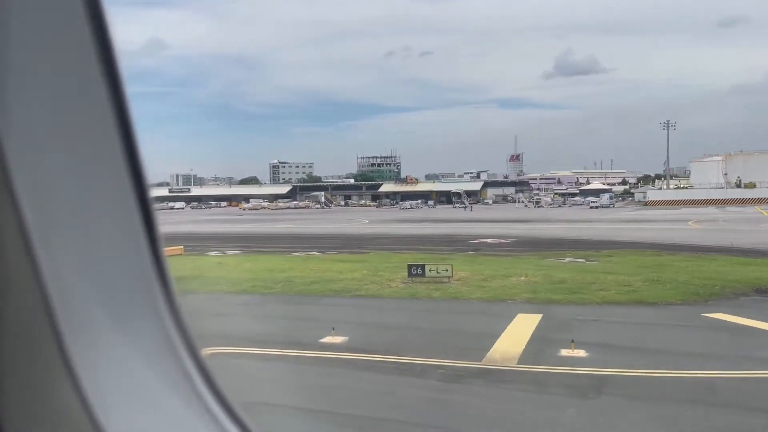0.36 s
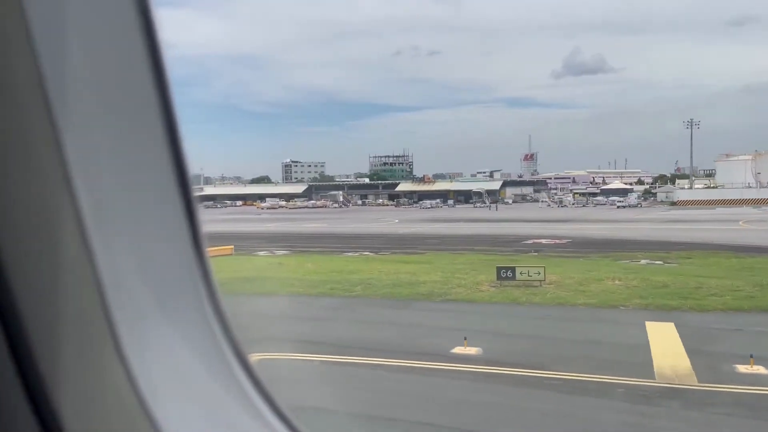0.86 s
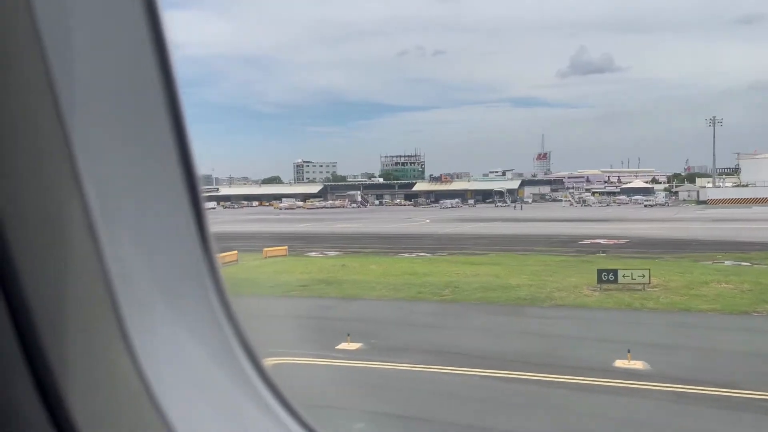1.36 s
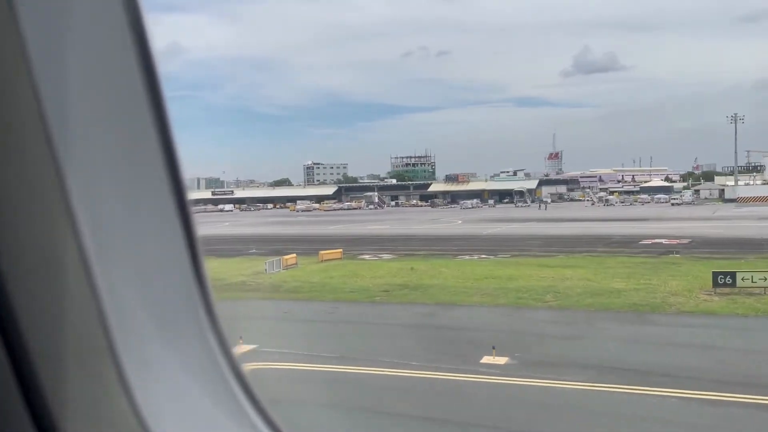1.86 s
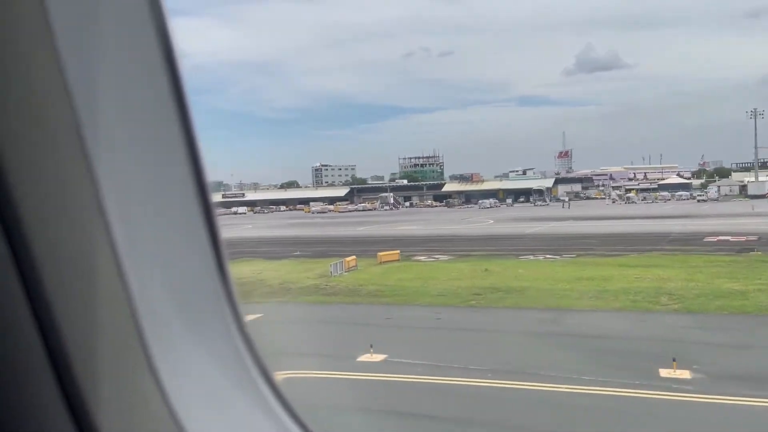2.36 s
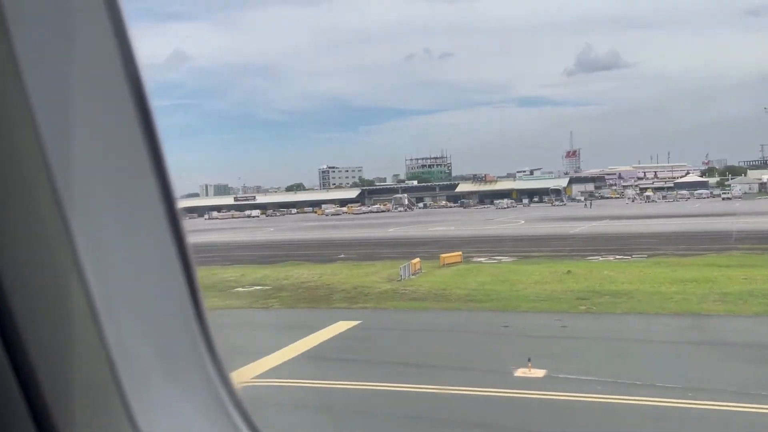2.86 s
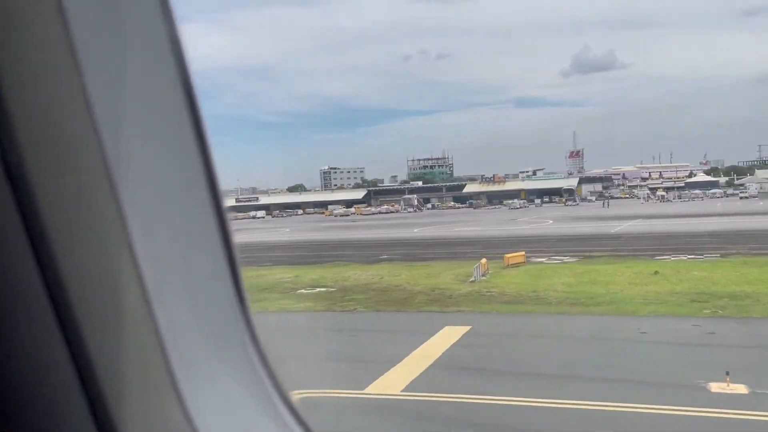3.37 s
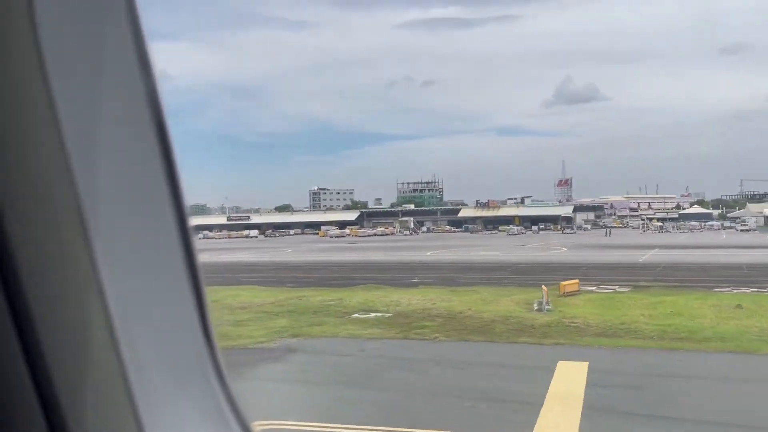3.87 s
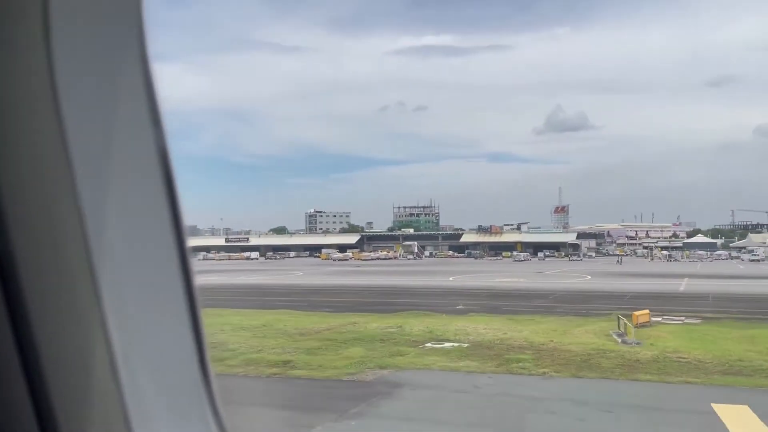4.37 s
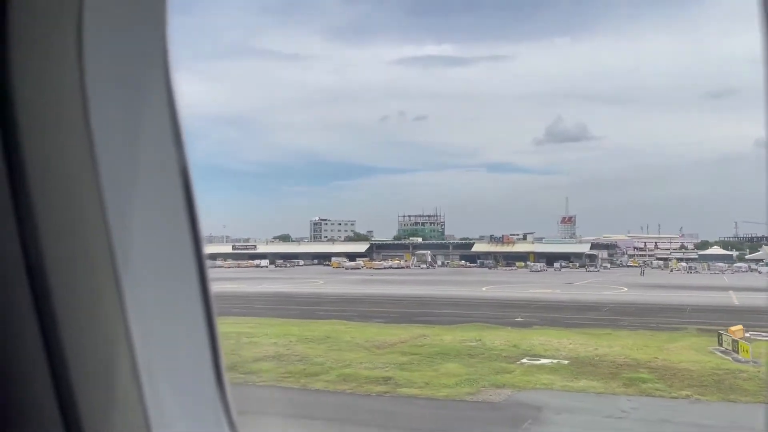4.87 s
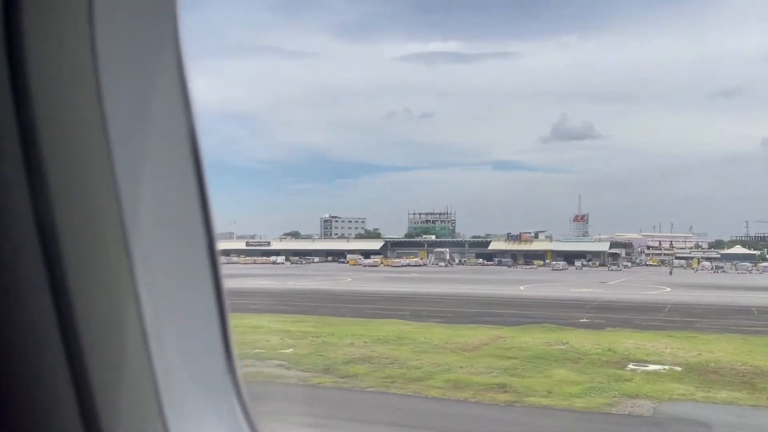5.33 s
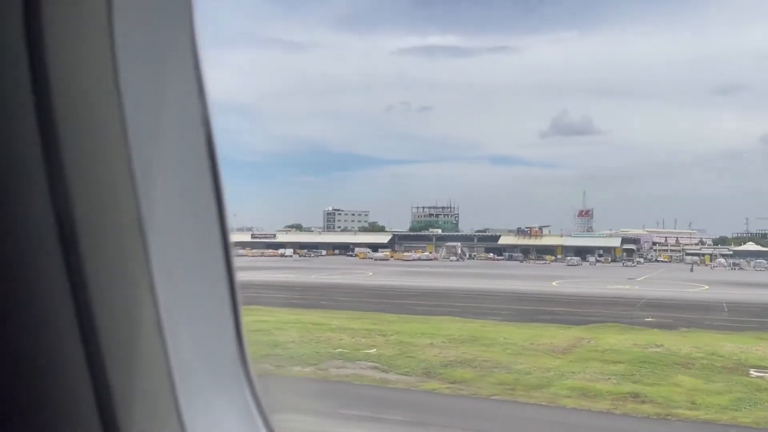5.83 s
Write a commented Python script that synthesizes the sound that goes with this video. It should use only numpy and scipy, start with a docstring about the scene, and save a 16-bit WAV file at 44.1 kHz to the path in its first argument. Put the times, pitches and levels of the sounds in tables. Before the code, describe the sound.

Inside a taxiing airliner cabin, a loud deep fuselage boom and airy vent hiss continue while trim panels knock and rattle over bumps.

```python
"""A deep fuselage boom and vent hiss throughout, inside a taxiing airliner cabin, on two close microphone ports.
Wheels and idling engines shake the fuselage; air conditioning and engine roar are coloured, flickering noise.
Pumps and spools hum and whine as wandering sines. Two bright ticks are noise bursts, a double moan is a
swelling tone, and a swish is a short swell of noise. Bumps in the taxiway make the trim panels rattle and
knock: struck resonances."""
import sys
import numpy as np
from scipy import signal
from scipy.fft import rfft, irfft, next_fast_len
from scipy.io import wavfile
from scipy.ndimage import uniform_filter1d

SR = 44100
rng = np.random.default_rng(int(sys.argv[2]) if len(sys.argv) > 2 else 0)


def invert_db(level):
    """Linear amplitude ratio for a level in decibels (20 dB per decade), elementwise."""
    return 10 ** (np.asarray(level, dtype=float) / 20)


def master(y):
    """Save y as 16-bit WAV."""
    cut = np.clip(np.atleast_2d(y).T, -1, 1)
    pcm = np.round(cut * 32767)  # scale
    wavfile.write(sys.argv[1], SR, pcm.astype(np.int16))


N = 263277
SIZE = next_fast_len(N)
HZ = np.maximum(np.arange(SIZE // 2 + 1) * SR / SIZE, 1)


def rms_one(x):
    """Scale to rms 1."""
    return x / np.sqrt(np.mean(x ** 2) + 1e-20)


def in_time(rows):
    """Each column after t/s as a curve over the samples."""
    s, *columns = np.transpose(rows)
    return [np.interp(np.arange(N) / SR, s, c) for c in columns]


def at_hz(points):
    """A table read at every frequency, on a log axis."""
    hz, value = np.transpose(points)
    return np.interp(np.log(HZ), np.log(np.maximum(hz, 1)), value)


def colour_of(spectrum):
    """Gain per frequency, silent from an octave outside the table."""
    inside = (HZ > spectrum[0][0] / 2) * (HZ < spectrum[-1][0] * 2)
    return invert_db(at_hz(spectrum)) * inside


def bell(hz, width_hz):
    """Magnitude of a resonance, 1 on top."""
    return 1 / np.sqrt(1 + (2 * (HZ - hz) / width_hz) ** 2)


def with_peaks(colour, peaks):
    """Raise or lower a colour around each (f/Hz, width/Hz, level/dB)."""
    return colour * invert_db(sum(rise_db * bell(hz, width_hz) ** 2 for hz, width_hz, rise_db in peaks))


def drift(rate):
    """Slow chance of spread 1: noise through two equal poles at rate Hz, drawn every 40 samples."""
    r = np.exp(-80 * np.pi * rate / SR)
    slow = signal.lfilter([1], [1, -2 * r, r * r], rng.standard_normal(N // 40 + 2002))
    slow = slow[2000:]  # let the filter settle
    return np.interp(np.arange(N) / 40, np.arange(len(slow)), rms_one(slow - slow.mean()))


# Likeness of the two microphone ports: f/Hz, left-right likeness [0 to 1]
PORT_LIKENESS = [(40, 1), (70, .998), (100, .98), (130, 0.9), (200, 0.92), (360, 0.66), (640, 0.38),
                 (1170, 0.35), (2110, 0.5), (3820, 0.54), (6910, 0.52), (9000, .31), (12500, 0.2)]
# Balance of the ports: f/Hz, left minus right level/dB
PORT_TILT = [(60, -0.15), (130, 0), (280, -0.5), (590, -2), (1270, 0), (2720, 2.5), (5830, 3.5),
             (12500, -1.5)]
# Phase between the ports: f/Hz, left leads by phase/rad
PORT_LEAD = [(30, 0), (520, .3), (780, .5), (1120, 2.7), (1500, 4.6), (1980, 5.0), (2240, 6.3), (2580, 7.1),
             (3270, 6.9), (5340, 6.8), (6290, 6.3), (12700, 6.3)]


def cabin_field(colour):
    """Coloured noise as two close microphone ports hear it, alike in the bass; a pair of spectra."""
    a, b = rfft(rng.standard_normal((2, SIZE)))
    alike = np.clip(at_hz(PORT_LIKENESS), 0, 1)
    right = (alike * a + np.sqrt(1 - alike ** 2) * b) * np.exp(-1j * at_hz(PORT_LEAD))
    half_tilt_db = at_hz(PORT_TILT) / 2
    return colour * np.array([a * invert_db(half_tilt_db), right * invert_db(-half_tilt_db)])


def patchy(field, low_hz, high_hz, patchy_db, rate, count):
    """Overlapping bands, each flickering on its own and a little together; rms 1."""
    place = np.clip(np.log(HZ / low_hz) / np.log(high_hz / low_hz), 0, 1) * (count - 1)
    together = drift(rate / 3)
    total = 0
    for k in range(count):
        band = irfft(field * np.clip(1 - abs(place - k), 0, 1), SIZE)[:, :N]
        total = total + invert_db(patchy_db * (drift(rate) + 0.29 * together)) * band
    return rms_one(total)


# Shaking of the fuselage while rolling: t/s, deep boom level/dB, upper boom level/dB
ROLL_LEVELS = [(0, -23, -23), (.45, -18, -22), (.7, -26, -22), (1.25, -17, -21.5), (1.7, -21, -22),
               (2.05, -18, -22.5), (2.5, -23, -22), (2.85, -22, -20.5), (3.1, -18, -21), (3.55, -16, -21),
               (4.1, -17, -20.5), (4.6, -21.5, -21.5), (4.97, -21.5, -23), (5.12, -15.5, -18.5),
               (5.55, -19.5, -19.5), (5.97, -18, -20)]
# Colour of the boom: f/Hz, relative density level/dB per Hz
BOOM_COLOUR = [(22, -19), (33, -24), (40, 0), (66, 0.5), (100, -8), (140, -11.5), (167, -14), (205, -18),
               (237, -28), (300, -38.5), (500, -90)]
# Fuselage resonances: f/Hz, width/Hz, level over the boom/dB
FUSELAGE_MODES = [(45.3, 4.2, 6.5), (59.2, 1.4, 7), (71.5, 1.6, 3.5), (87.7, 9.1, 2), (160.5, 2.9, 4.5)]


def boom():
    """Road and engine shake drive the fuselage, whose low modes stand out; deep and upper parts surge apart."""
    field = cabin_field(with_peaks(colour_of(BOOM_COLOUR), FUSELAGE_MODES))
    deep_share = 1 / (1 + (HZ / 68) ** 8)
    deep_db, upper_db = in_time(ROLL_LEVELS)
    deep = rms_one(irfft(field * deep_share, SIZE)[:, :N])
    upper = patchy(field * (1 - deep_share), 73, 270, patchy_db=1.16, rate=5.3, count=2)
    return invert_db(deep_db) * deep + invert_db(upper_db) * upper


# Bumps in the taxiway: t/s, strength level/dB, settling t60/s
TAXIWAY_BUMPS = [(.6, -52, 3.0), (1.2, -53, 2.0), (2.5, -48, 1.5), (3.7, -54, 2.0), (5.1, -44, 5.0)]


def jolts():
    """Each bump rises quickly and settles; the sum is how hard the trim shakes."""
    rise_s = .05
    t = np.arange(N) / SR
    out = 0
    for s, db, t60 in TAXIWAY_BUMPS:
        since = np.maximum(t - s, 0)
        out = out + invert_db(db - 60 * since / t60) * (1 - np.exp(-since / rise_s))
    return out


# Colour of the roar through the wall: f/Hz, relative density level/dB per Hz
ROAR_COLOUR = [(120, -32.5), (200, -4.5), (245, -8.5), (295, -3), (345, -9.5), (430, -10.5), (544, -14.5),
               (667, -17.5), (805, -18), (1400, -26.5), (1820, -33), (3000, -100)]


def roar():
    """Engine and tyre roar dulled by the wall, dipping very slightly on bumps."""
    smooth_ground_db, strongest_bump_db = -36, -0.5  # the second is added at the hardest shake
    shake = jolts()
    level_db = smooth_ground_db + strongest_bump_db * shake / shake.max()
    noise = patchy(cabin_field(colour_of(ROAR_COLOUR)), 210, 1460, patchy_db=1.2, rate=3.2, count=3)
    return invert_db(level_db) * noise


def shifting_ripple(x, count):
    """Fine standing waves that shift as the hand moves: random peaks and dips, pattern blending into pattern."""
    ripple_db, ripple_width_hz = 2.5, 70
    spectrum, bins = rfft(x, SIZE), int(ripple_width_hz * SIZE / SR)
    place = np.arange(N) / N * (count - 1)
    patterns = rng.standard_normal((count, len(HZ)))
    patterns = uniform_filter1d(uniform_filter1d(patterns, bins), bins)
    total = 0
    for k, pattern in enumerate(patterns):
        rippled = irfft(spectrum * invert_db(ripple_db * rms_one(pattern)), SIZE)[:, :N]
        total = total + np.clip(1 - abs(place - k), 0, 1) * rippled
    return rms_one(total)


def whistle(hz, level_db, width_hz):
    """A narrow band of noise carried along a slowly moving, wavering centre."""
    waver_hz, waver_db = 35, 2.5
    # positive frequencies alone, so that the whole band can be shifted
    band = np.fft.ifft(cabin_field(bell(hz.mean(), width_hz) ** 2), SIZE)[:, :N]
    offset_hz = hz - hz.mean() + waver_hz * drift(2.5)
    shifted = np.real(band * np.exp(2j * np.pi * np.cumsum(offset_hz) / SR))
    return invert_db(level_db + waver_db * drift(3.0)) * rms_one(shifted)


# Vent hiss: t/s, level/dB
VENT_LEVEL = [(0, -45), (1.4, -46.5), (3.0, -44.5), (4.1, -44.5), (4.75, -45), (5.27, -44), (5.97, -45)]
# Colour of the hiss: f/Hz, relative density level/dB per Hz
HISS_COLOUR = [(650, -18.5), (1100, 0), (1510, -4.5), (1880, 0.5), (2260, -2.5), (2640, -2), (3350, -5),
               (4160, -6.5), (4810, -11), (5560, -14), (8500, -13), (11000, -10.5), (11700, -13),
               (13000, -13), (16800, -61)]
# Narrow treble peaks and a notch: f/Hz, width/Hz, level/dB
TREBLE_PEAKS = [(8950, 120, 6), (9780, 380, 9), (10250, 160, -22), (10900, 600, 8)]
# Standing waves by the window: f/Hz, width/Hz, level/dB
WINDOW_WAVES = [(3060, 150, 3), (3450, 160, -3), (3660, 130, 3), (4530, 170, 4), (6240, 60, 4)]
# Breathy vent whistles: t/s, upper f/Hz, upper level/dB, lower f/Hz, lower level/dB
VENT_WHISTLES = [(0, 4330, -63, 2820, -62), (1.4, 4270, -61, 2760, -58), (2.4, 4260, -60, 2650, -59),
                 (2.9, 4210, -58.5, 2600, -58), (4.05, 4190, -56.5, 2600, -59), (4.3, 4200, -66, 2620, -57),
                 (5.97, 4300, -64, 2560, -58)]


def air():
    """Vent hiss, coloured by the window and narrow treble peaks, with two faint breathy whistles."""
    field = cabin_field(with_peaks(colour_of(HISS_COLOUR), TREBLE_PEAKS + WINDOW_WAVES))
    hiss = shifting_ripple(patchy(field, 1370, 10200, patchy_db=1.1, rate=14.0, count=5), count=8)
    upper_hz, upper_db, lower_hz, lower_db = in_time(VENT_WHISTLES)
    upper = whistle(upper_hz, upper_db, width_hz=110)
    lower = whistle(lower_hz, lower_db, width_hz=190)
    return invert_db(in_time(VENT_LEVEL)[0]) * hiss + upper + lower


def wandering(hz, width_hz):
    """Phase of a tone whose random walk widens it to its width."""
    walk = np.cumsum(rng.standard_normal(N)) * np.sqrt(2 * np.pi * abs(width_hz) / SR)
    return 2 * np.pi * hz * np.arange(N) / SR + walk


# Hums and whines, the two lowest beating together:
# f/Hz, width/Hz, rms level/dB, left minus right level/dB, left leads by phase/rad, swell spread/dB
HUM_TONES = [(385.4, .15, -45, -8, .4, 1.8), (391.6, .15, -49.5, -8, .4, 1.5),
             (545, 10, -50, -1.5, .4, 2.8), (835, 8, -61, .3, .6, 2.8), (5866, 4, -73, 1.5, .4, 2.8)]


def hums():
    """Steady pump and spool tones that swell a little."""
    out = np.zeros((2, N))
    for hz, width_hz, level_db, pan_db, lead, swell_db in HUM_TONES:
        swell = np.sqrt(2) * invert_db(level_db + swell_db * drift(9.0))
        pan = invert_db([[pan_db / 2], [-pan_db / 2]])
        out += swell * pan * np.sin(wandering(hz, width_hz) - np.array([[0], [lead]]))
    return out


# Spool whine: t/s, fundamental level/dB
WHINE_LEVEL = [(0, -58), (1.9, -58.5), (2.3, -56), (2.6, -58), (3.2, -63.5), (3.9, -70), (4.75, -66),
               (5.97, -62)]
# Fundamental and its overtones in order: level/dB over the fundamental
SPOOL_PARTIALS = [0, -9, -12]


def spool():
    """The engine whine, with two overtones locked to it, slightly stronger on the left."""
    phase = wandering(hz=1936, width_hz=2.1)
    right_lead = np.array([[0], [1.1]])  # radians
    whine = sum(invert_db(db) * np.sin((k + 1) * phase + right_lead) for k, db in enumerate(SPOOL_PARTIALS))
    return np.sqrt(2) * invert_db(in_time(WHINE_LEVEL)[0]) * invert_db([[1.1], [-1.1]]) * whine


# Bright ticks: t/s, bright strength level/dB, bright t60/s, core strength level/dB
TICK_EVENTS = [(.088, -23.5, 0.08, -38), (4.87, -25, 0.065, -35.5)]
# Colour of the bright part: f/Hz, relative density level/dB per Hz
TICK_SPECTRUM = [(900, -1), (2500, -14), (5000, -12), (7500, -7.5), (10500, 2.5), (12500, -4), (14000, -17),
                 (15500, -17), (17000, -40)]


def ticks():
    """Short bursts of bright noise with a dry core, close to the microphone and so near the centre."""
    rise_s, core_t60_s, core_low_hz, core_high_hz = 0.002, .05, 2300, 9000
    halo_s, halo_db, side_db = .014, -19, -8
    t = np.arange(N) / SR
    bright_shape = core_shape = 0
    for s, strength_db, t60, core_db in TICK_EVENTS:
        since = np.clip(t - s, 0, 1)
        rise = 1 - np.exp(-since / rise_s)
        # a faint smear of noise is heard just ahead of each tick and under its start
        halo = invert_db(halo_db) * np.exp(-((t - s) / halo_s) ** 2)
        bright_shape = bright_shape + invert_db(strength_db - 6) * (halo + invert_db(-60 * since / t60) * rise)
        # before the tick, rise is zero and so is the core
        core_shape = core_shape + invert_db(core_db - 60 * since / core_t60_s) * rise
    mid, side, core = rfft(rng.standard_normal((3, SIZE)))
    stereo = mid + invert_db(side_db) * side * [[1], [-1]]
    bright = irfft(colour_of(TICK_SPECTRUM) * stereo, SIZE)[:, :N]
    core_colour = (HZ > core_low_hz) / np.sqrt(HZ) / np.hypot(1, (HZ / core_high_hz) ** 2)
    broad = irfft(core * core_colour, SIZE)[:N]
    return bright_shape * rms_one(bright) + core_shape * rms_one(broad)


def floor_boom():
    """A broad low mode of the floor that follows the shaking, smoothed over a fifth of a second."""
    shake = jolts()
    field = cabin_field(bell(86, width_hz=28) ** 2)
    slow = uniform_filter1d(shake / shake.max(), SR // 5)
    return invert_db(-19) * slow * rms_one(irfft(field, SIZE)[:, :N])


# Trim panel modes: f/Hz, level/dB, t60/s
PANEL_MODES = [(393, -6, 0.045), (543, -3, 0.03), (770, -3.5, 0.016), (1240, -3.5, 0.01), (1800, -2, 0.006),
               (2400, -5, 0.006), (3130, -8, 0.008)]


def panel(force, mode):
    """One panel mode, a two-pole resonance, set ringing by a force."""
    hz, level_db, t60 = mode
    r, w = invert_db(-60 / (t60 * SR)), 2 * np.pi * hz / SR
    ring = signal.lfilter([0, np.sin(w)], [1, -2 * r * np.cos(w), r * r], force + 1e-18)
    return invert_db(level_db) * ring


def rattle():
    """Random small taps of uneven size ring the trim panels as hard as the bumps shake them."""
    taps_per_s = 180
    at = np.flatnonzero(rng.random(N) < taps_per_s / SR)
    sizes = invert_db(2.5 * np.minimum(rng.exponential(1, len(at)), 4))
    sound, force = 0, np.zeros((2, N))
    for mode in PANEL_MODES:
        shared, apart = rng.standard_normal(len(at)), rng.standard_normal((2, len(at)))
        force[:, at] = sizes * (shared + 1.1 * apart)
        sound = sound + panel(force, mode)
    return jolts() * rms_one(sound)


# Two short moans: t/s, length/s, f/Hz, peak rms level before panning and waver/dB
MOAN_EVENTS = [(.785, .31, 490, -34), (1.255, .135, 491, -33)]


def moans():
    """A near-pure tone swells twice, as a dragging brake or strut would, nearer the right."""
    peak_share, start_db, end_db, edge_s = .62, -6.5, -9, .035
    waver_db = 1.8
    sag_hz_per_s = 36  # the longer the moan, the deeper its pitch sags in the middle
    out = np.zeros((2, N))
    t = np.arange(N) / SR
    for s, length, hz, peak_db in MOAN_EVENTS:
        done = np.clip((t - s) / length, 0, 1)
        gate = np.clip(np.minimum(done, 1 - done) * length / edge_s, 0, 1)
        swell_db = np.interp(done, [0, peak_share, 1], [start_db, 0, end_db])
        level_db = peak_db + waver_db * drift(11.0) + swell_db
        pitch_hz = hz - sag_hz_per_s * length * np.sin(np.pi * done) ** 2
        phase = 2 * np.pi * np.cumsum(pitch_hz) / SR
        tone = np.sin(phase - np.array([[0], [.6]]))  # left leads, radians
        out += np.sqrt(2) * invert_db(level_db) * gate * invert_db([[-2.4], [2.4]]) * tone
    return out


# Trim knocks: t/s, strength level/dB, brightness f/Hz, contact length/s
TRIM_KNOCKS = [(2.505, -27, 900, 0.0053), (3.058, -30, 1200, 0.0036), (3.580, -31, 2400, 0.0006),
               (3.598, -28.5, 1500, .0006), (3.633, -26, 1100, 0.0015), (3.654, -28.5, 1200, .0012),
               (3.676, -29, 1600, 0.003), (3.7135, -21, 900, 0.001), (3.735, -23.5, 700, .018),
               (3.762, -21.5, 700, 0.002), (3.778, -21, 500, .006), (3.795, -22.5, 500, 0.015),
               (3.868, -22.5, 650, .02), (5.135, -30, 2600, 0.025), (5.2, -23.5, 1800, 0.02),
               (5.25, -28.5, 900, 0.025), (5.329, -23, 2400, 0.015), (5.415, -28, 1800, 0.014),
               (5.438, -27, 1800, 0.014), (5.52, -29.5, 1500, 0.02)]


def knocks():
    """Each knock is a tap with a short scuffing contact; modes above its brightness are struck more weakly."""
    out, t = np.zeros((2, N)), np.arange(3000) / SR
    for k, mode in enumerate(PANEL_MODES):
        force = np.zeros((2, N))
        for s, strength_db, bright_hz, length in TRIM_KNOCKS:
            scuff = rng.standard_normal(3000) + 0.36 * rng.standard_normal((2, 3000))
            scuff *= np.exp(-t / length) * (1 - np.exp(-4 * t / length))
            # longer contacts scuff more
            scuff *= length / (length + .003) / np.sqrt(0.002 * SR)
            # short contacts start with a crisp tap, its sign alternating from mode to mode
            scuff[:, 0] = (-1) ** k * 0.0065 / (0.0025 + length) * np.exp(-length / .01)
            strike = invert_db(strength_db - 3.5) / np.hypot(1, (mode[0] / bright_hz) ** 1.5)
            force[:, int(s * SR):][:, :3000] += strike * scuff
        out += panel(force, mode)
    return out


# A soft swish of cloth, one row: t/s, rms level at its peak/dB, length/s, centre f/Hz, width/Hz
CLOTH_SWISH = (5.218, -50.5, .035, 6300, 4500)


def swish():
    """One soft swell of bright noise, as of cloth."""
    s, db, length, hz, width_hz = CLOTH_SWISH
    shape = np.exp(-((np.arange(N) / SR - s) / length) ** 2)
    noise = irfft(cabin_field(bell(hz, width_hz) ** 2), SIZE)[:, :N]
    return invert_db(db) * shape * rms_one(noise)


def scene():
    """All sources reach both microphone ports."""
    steady = boom() + roar() + air() + hums() + spool()
    passing = ticks() + floor_boom() + rattle() + moans() + knocks() + swish()
    return steady + passing


def roll_off(x):
    """The treble ends steeply here."""
    return signal.sosfilt(signal.butter(12, 15800, fs=SR, output="sos"), x)


def record(dry):
    """Peaks at the microphone are gently rounded."""
    mix = 1.49 * np.tanh(dry / 1.507)
    return roll_off(mix)


dry = scene()
out = record(dry)
master(out)
```